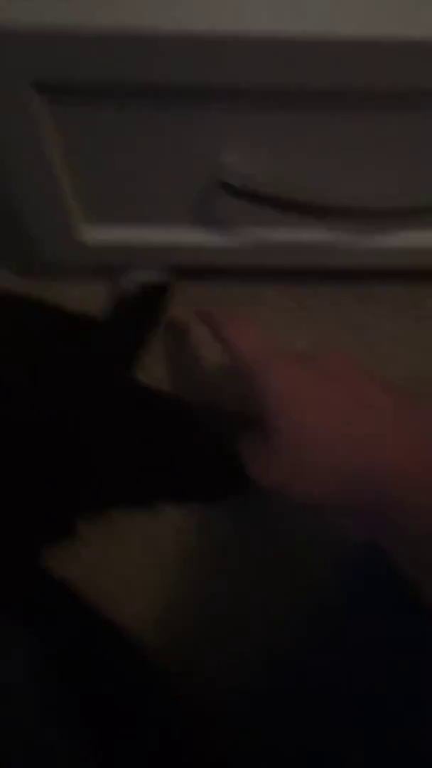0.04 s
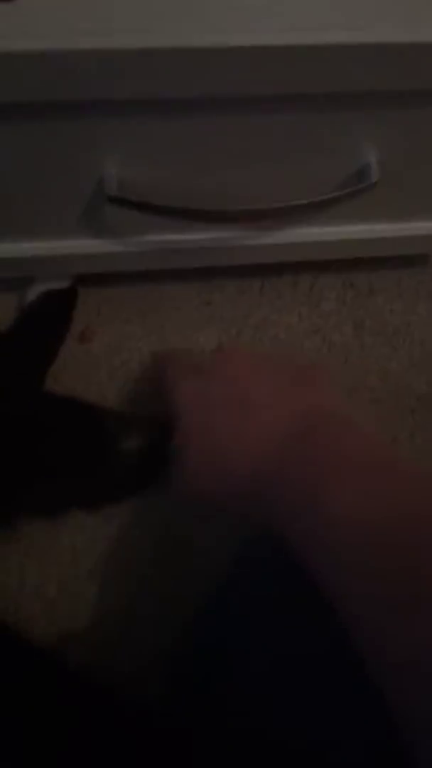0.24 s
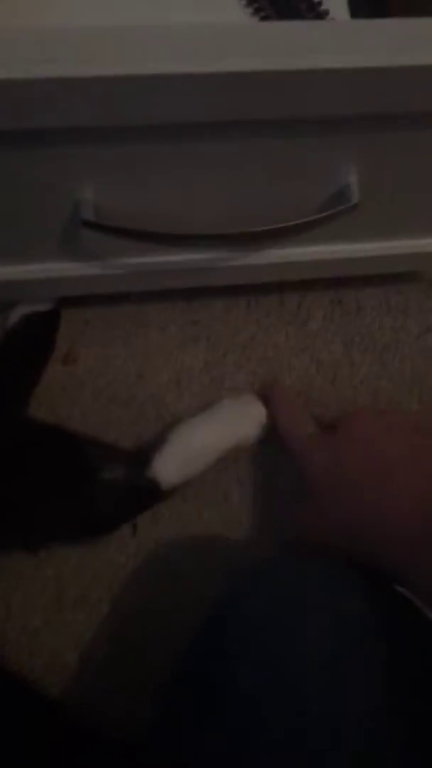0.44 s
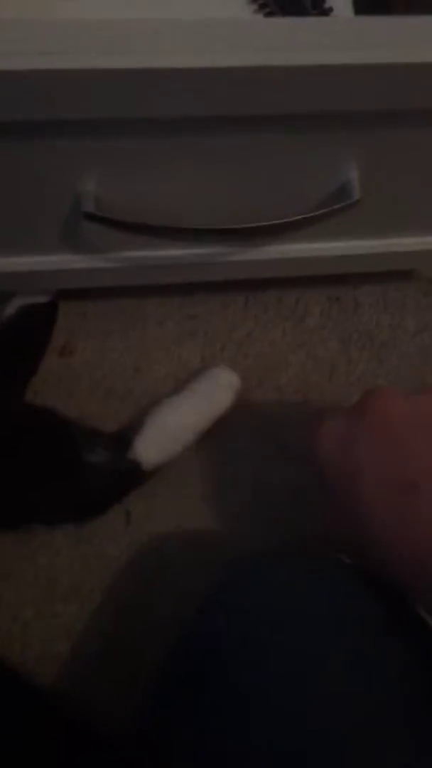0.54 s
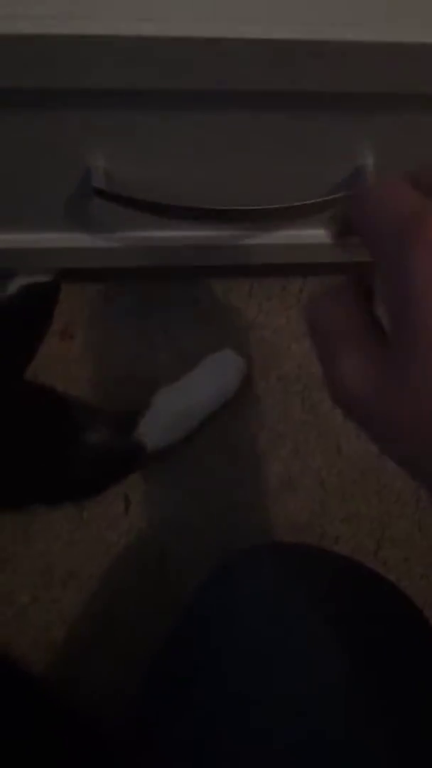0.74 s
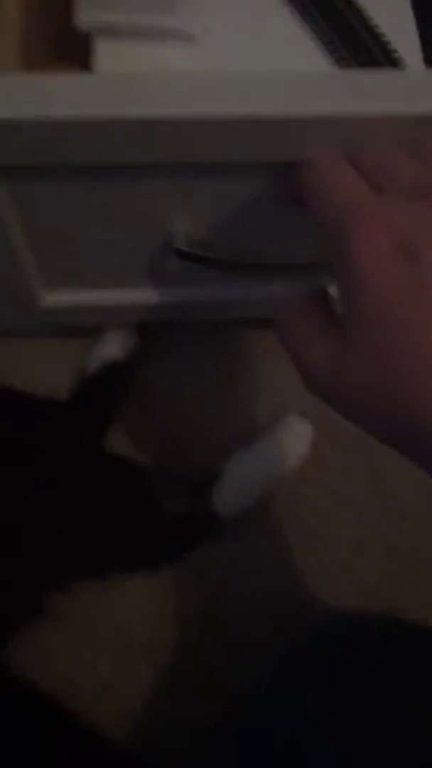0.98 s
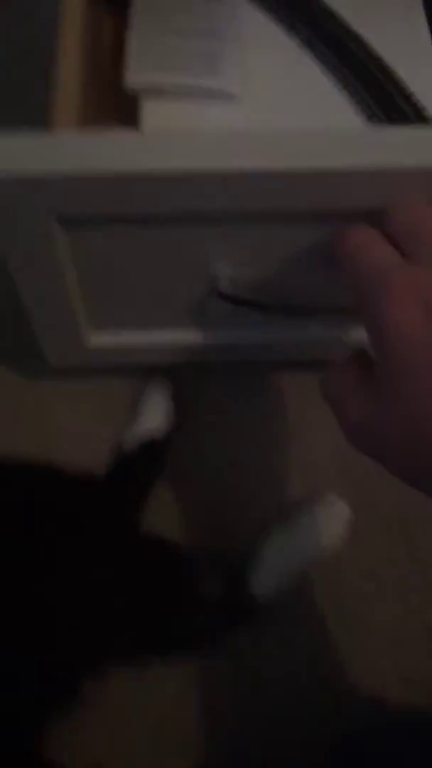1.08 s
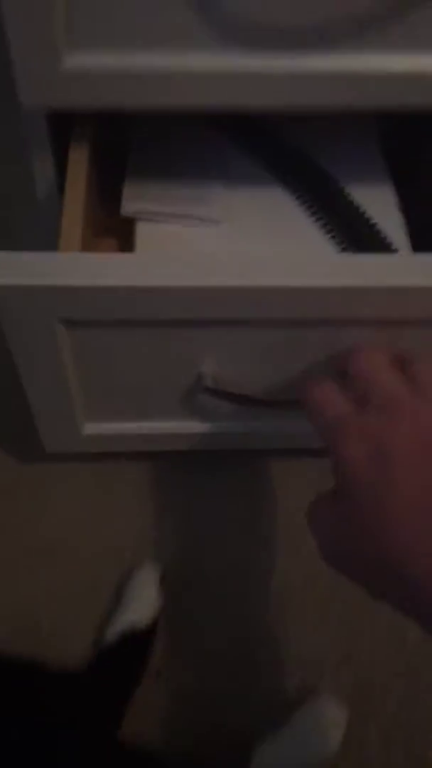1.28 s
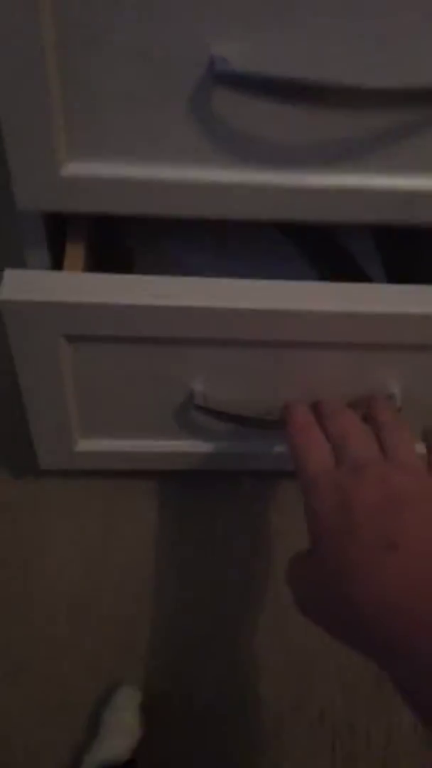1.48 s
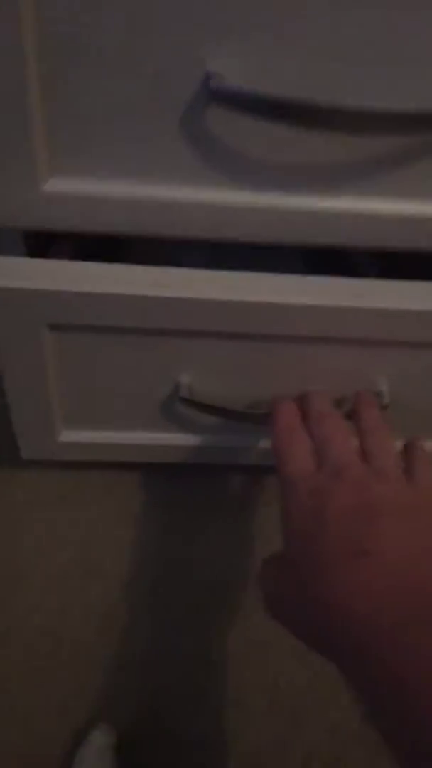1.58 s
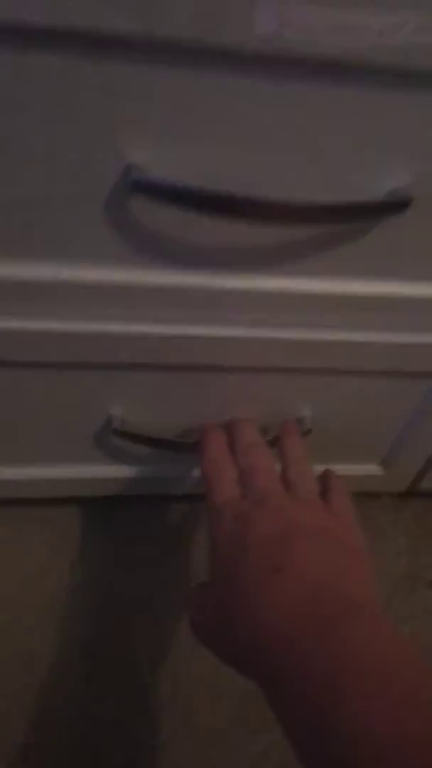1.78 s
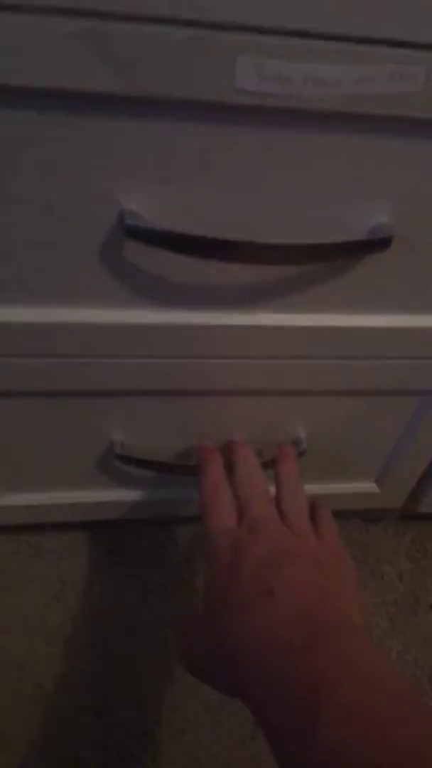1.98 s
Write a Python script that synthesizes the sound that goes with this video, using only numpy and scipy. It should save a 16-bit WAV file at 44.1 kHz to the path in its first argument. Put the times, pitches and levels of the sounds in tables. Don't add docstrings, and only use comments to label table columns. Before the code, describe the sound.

A wooden drawer closes by hand: after a quiet second of faint paw pads and rustling, it bumps and thrums along its rail, contents rattling, then clicks shut. Close, damped home room, phone microphone.

```python
import sys
import numpy as np
from scipy import signal
from scipy.fft import rfft, irfft
from scipy.io import wavfile
from scipy.ndimage import uniform_filter1d

SR = 44100
rng = np.random.default_rng(int(sys.argv[2]) if len(sys.argv) > 2 else 0)


def master_out(mix):
    frames = np.transpose(np.atleast_2d(mix))
    ceiling = np.clip(frames, -1, 1)
    pcm = np.round(ceiling * 32767).astype(np.int16)
    wavfile.write(sys.argv[1], SR, pcm)


def ratio(d):
    e = np.asarray(d, float) / 20
    return 10 ** e


N = 89302

# (frequency [Hz], density [dB per Hz])
HUSH = [(18, -33), (30, 0), (150, -9), (448, -13), (538, -11.5), (735, -19.5), (928, -18.5), (1030, -20),
        (15000, -38)]
# (peak time [s], peak level [dB], pitch [Hz])
PAWS = [
    (0.043, -65, 80),
    (.246, -44, 141),
    (0.393, -53.5, 135),
    (0.451, -55.5, 129),
    (0.641, -57, 160),
]
# (start [s], length [s], level [dB], centre [Hz], width as share of centre [-])
RUSTLES = [
    (-.02, 0.22, -68, 1960, 0.23),
    (-.02, 0.24, -73.5, 2890, 0.095),
    (-.02, 0.28, -75.5, 1360, 0.22),
    (0.058, 0.067, -74.5, 3900, 0.55),
    (0.266, .03, -77, 2630, 0.21),
    (.4, 0.31, -76, 2593, 0.38),
    (0.403, .12, -75, 3861, 1.7),
    (0.497, 1, -77.5, 1430, .054),
    (.58, 0.12, -68.5, 500, 0.45),
    (.704, 0.65, -71, 450, .17),
]
# (centre [Hz], width [Hz], level [dB])
SLEEVE = [(4200, 3600, -71), (7600, 7700, -69), (12600, 3500, -82)]
# (frequency [Hz], density [dB per Hz])
DAMPER = [(350, -27.5), (600, -16), (1720, -6.5), (2500, -10), (6690, -13), (8410, -31), (9240, -18.5),
          (10600, -32), (15000, -34)]
# (time [s], peak level [dB], pitch [Hz], t60 [s])
TICKS = [(.156, -62.5, 2710, .083), (.166, -54.5, 5760, 0.0089), (.166, -60, 12400, .009),
         (.166, -60, 10000, .009), (0.1718, -49.5, 1707, 0.035), (0.1721, -43, 2870, 0.013),
         (0.173, -42, 2083, 0.0056), (.173, -60, 5600, .0083), (.968, -51, 2100, 0.025),
         (1.035, -52, 1380, .03), (1.342, -59, 12300, .0083), (1.494, -57, 5650, .04),
         (1.496, -56, 4300, .02), (1.496, -59, 11400, .013), (1.671, -51, 2800, .03),
         (1.472, -49, 2350, .05), (1.565, -41, 1200, .03), (1.9352, -36, 3900, .005),
         (1.9345, -57, 6900, 0.0064), (1.9345, -60, 13200, .0046), (1.9353, -15, 2440, 0.0021),
         (0.969, -45, 1380, 0.023), (0.9742, -43.5, 781, 0.059), (1.0724, -52, 1543, 0.089),
          (1.0752, -41, 790, 0.1), (1.0831, -38.5, 840, 0.018), (1.0867, -47.5, 690, 0.088),
          (1.2544, -44.0, 2700, 0.02), (1.257, -40.5, 2290, 0.019), (1.2586, -38, 1310, 0.026),
          (1.2621, -43.2, 3390, 0.026), (1.2712, -42, 1600, 0.025), (1.275, -45, 3280, 0.035),
          (1.2761, -44.9, 1830, 0.046), (1.278, -37.5, 1420, 0.084), (1.2785, -49, 2330, 0.051),
          (1.3398, -51.5, 1510, 0.04), (1.3408, -48, 3399, 0.088), (1.3595, -40, 1456, 0.07),
          (1.4166, -40, 1740, 0.02), (1.4441, -48, 1980, 0.07), (1.5623, -53, 4200, 0.016),
          (1.5625, -41.0, 2590, 0.043), (1.5643, -40.5, 1960, 0.02), (1.5669, -41.5, 5620, 0.018),
          (1.5665, -46, 1684, 0.1), (1.5686, -38.6, 3630, 0.055), (1.5724, -40.5, 2290, 0.086),
          (1.574, -41, 3030, 0.049), (1.574, -43, 4200, 0.018), (1.5837, -36, 2100, 0.02),
          (1.5866, -38, 3790, 0.018), (1.6042, -45, 2100, 0.04)]
# (time [s], level [dB], t60 [s], centre [Hz], width as share of centre [-])
RATTLES = [(0.967, -58, 0.028, 1700, 1.2), (0.969, -60.5, 0.03, 12100, .8), (0.967, -50.5, 0.2, 496, 0.47),
           (1.072, -42.5, 0.11, 750, 0.4), (1.073, -51.5, 0.27, 1560, 0.92), (1.23, -49, 0.053, 2500, 0.1),
           (1.255, -45.5, 0.096, 2190, 0.34), (1.255, -53, 0.13, 3370, 0.092),
           (1.255, -57, 0.16, 5100, 0.5), (1.269, -52, 0.12, 1430, 0.078), (1.339, -53.5, 0.17, 3070, 1.15),
           (1.442, -52.5, 0.22, 3260, 0.22), (1.447, -51, 0.21, 2300, .3), (1.448, -58.5, 0.13, 5600, .3),
           (1.409, -52, 0.23, 2230, 0.41), (1.668, -65, 0.082, 12300, 0.31), (1.56, -38, 0.27, 2300, 0.41),
           (1.56, -40.5, 0.21, 3480, 0.37), (1.562, -43.5, 0.14, 6300, 0.31),
           (1.558, -45.5, 0.035, 8800, .35), (1.565, -40.5, 0.18, 1240, 0.65),
           (1.604, -52.5, 0.48, 2560, 0.71), (1.655, -48.5, 0.27, 450, 0.021),
           (1.667, -52, 0.14, 3200, 0.37), (1.934, -33.5, 0.021, 2230, 0.8), (1.945, -51, 0.13, 2030, 1.5)]
# (centre [Hz], width [Hz], level [dB])
RAIL_MODES = [(450, 69, 8.5), (603, 70, 9.5), (776, 61, 1), (1050, 63, 7), (1430, 150, 6.5),
              (1704, 190, -2.5), (2300, 170, -5.5), (2660, 100, -19), (3370, 46, -8), (3970, 79, -6.5),
              (5430, 240, -13.5), (6460, 900, -15.5), (9270, 400, -22.5)]
# (frequency [Hz], density [dB per Hz])
RAIL_WASH = [(180, -3), (400, -5.5), (600, -9.5), (3000, -17.5), (4500, -25.5), (6000, -35.5), (9000, -64),
             (15000, -63)]
# (centre [Hz], width [Hz], level [dB])
BOX_MODES = [(42, 21, -22), (91, 35, -5.5), (121, 32, -4), (153, 36, -6), (200, 17.6, -13.5),
             (254.3, 22, -20.5)]
# (peak time [s], length [s], peak level [dB], pitch [Hz])
BUMPS = [(1.003, .088, -41.5, 211.7), (1.012, 0.074, -49.5, 129), (0.989, 0.019, -43.5, 278),
         (1.072, 0.016, -45, 218), (1.099, .03, -34.5, 164.5), (1.122, 0.04, -39.5, 124),
         (1.152, 0.044, -31, 157.3), (1.165, 0.036, -35, 215.3), (1.184, 0.016, -32, 145),
         (1.186, 0.033, -33, 204), (1.224, 0.048, -28.5, 150.3), (1.23, 0.037, -38, 224),
         (1.255, 0.035, -28, 149.6), (1.262, 0.026, -37, 238), (1.288, 0.037, -25, 163.2),
         (1.317, 0.04, -35.5, 257), (1.325, 0.017, -25.5, 165.6), (1.348, 0.046, -30.5, 225),
         (1.349, 0.054, -19.5, 150.7), (1.377, .03, -22, 144), (1.402, 0.017, -28.5, 180),
         (1.424, 0.02, -20.5, 145), (1.443, 0.026, -24.5, 180), (1.472, 0.049, -28, 151.4),
         (1.493, 0.023, -33, 188), (1.518, 0.02, -27.5, 149), (1.541, 0.033, -32.5, 109),
         (1.573, 0.024, -24.5, 200), (1.573, 0.026, -37, 296), (1.587, 0.022, -24, 130),
         (1.614, 0.029, -33.5, 200), (1.619, 0.024, -27.5, 131.5), (1.641, 0.042, -27, 115.4),
         (1.671, 0.053, -43.5, 224), (1.674, 0.023, -29, 120), (1.703, 0.023, -35.6, 118),
         (1.726, 0.032, -37, 200), (1.735, 0.022, -35.5, 118), (1.751, 0.044, -35.5, 151),
         (1.77, 0.021, -34, 172), (1.78, 0.023, -32, 112), (1.8, 0.012, -36, 155),
         (1.817, 0.021, -33.5, 132), (1.862, 0.045, -38, 134.4), (1.901, 0.023, -36.5, 117),
         (1.93, 0.02, -34.5, 132), (1.957, 0.02, -47.5, 137), (1.984, 0.037, -46, 108),
         (2.012, 0.032, -34, 100.5)]
# (time [s], box thrum [dB], rail hiss [dB])
SLIDE = [
    (1.061, -44.5, -56),
    (1.15, -30.5, -56),
    (1.25, -26.5, -51.5),
    (1.34, -32, -50),
    (1.44, -23, -49.5),
    (1.511, -51.5, -52),
    (1.543, -29.5, -56),
    (1.64, -31, -54),
    (1.95, -44.5, -65),
]
# (frequency [Hz], gain [dB])
MIC = [(6000, 0), (9500, -3), (10500, -8), (11300, -2.5), (15000, -2.5)]

HUSH_DB = -67.5
PAW_S = 0.0048
RUSTLE_RISE_S, RUSTLE_FADE_SHARE, RUSTLE_FLICKER_DB = .006, .55, 1.2
SLEEVE_START_S, SLEEVE_LENGTH_S = .975, .4
DAMPER_START_S, DAMPER_RISE_S, DAMPER_DB = 1.65, .05, -58.5
RATTLE_RISE_S, RATTLE_RING_DB = 0.00032, -8
GRIT_PER_S, GRIT_SPREAD_DB = 1200, 4.5
WASH_FLICKER_DB, RING_FLICKER_DB, RAIL_RING_DB = 1.6, 4, -2
CLOSING_TILT_DB = -8.5
THRUM_DB, BUMP_WOBBLE = -12, .015
SLIDE_START_S, SLIDE_RISE_S = .967, .003
ECHO_DB, ECHO_T60_S = -21, 0.4
LOW_CUT_HZ, TOP_HZ = 33, 15800


def unit(x):
    return x / np.sqrt(np.mean(x ** 2))


def noise():
    return rng.standard_normal(N)


def ring(x, hz, width_hz, times=1):
    b, a = signal.iirpeak(hz, hz / width_hz, fs=SR)
    for _ in range(times):
        x = signal.lfilter(b, a, x)
    return x


def coloured(x, table):
    hz, db = np.array(table, float).T
    f = np.arange(N // 2 + 1) * SR / N + 1
    return irfft(rfft(x) * ratio(np.interp(np.log(f), np.log(hz), db)), N)


def walk(rate_hz):
    k = int(SR / rate_hz)
    held = np.repeat(rng.standard_normal(N // 50), k)[:N]
    return 1.3 * uniform_filter1d(uniform_filter1d(held, k), k)


def strike(t, start_s, rise_s, t60_s):
    u = np.clip(t - start_s, 0, None)
    return (1 - np.exp(-u / rise_s)) * ratio(-60 * u / t60_s)


def bell(t, peak_s, spread_s):
    return np.exp(-.5 * ((t - peak_s) / spread_s) ** 2)


def swell(t, start_s, length_s):
    rise = np.clip((t - start_s) / RUSTLE_RISE_S, 0, 1)
    fade = np.clip((start_s + length_s - t) / (RUSTLE_FADE_SHARE * length_s), 0, 1)
    return rise * fade


def grit():
    hit = rng.random(N) < GRIT_PER_S / SR
    size = np.minimum(rng.exponential(size=N), 3)
    return unit(noise() * (1 + hit * ratio(GRIT_SPREAD_DB * size)))


def brushing():
    return ratio(RUSTLE_FLICKER_DB * walk(40.04)) * grit()


def metal(x, flicker_db):
    out = 0
    for hz, width_hz, db in RAIL_MODES:
        mode = ring(ring(x, hz, 2.56 * width_hz), hz, 3 * width_hz)
        out = out + ratio(db + np.roll(flicker_db, int(hz))) * mode
    return unit(out)


def room_hush():
    return ratio(HUSH_DB + 0.17 * walk(4.2)) * unit(coloured(noise(), HUSH))


def cat(t):
    out = 0
    for peak_s, db, hz in PAWS:
        out = out + ratio(db) * bell(t, peak_s, PAW_S) * np.cos(2 * np.pi * hz * (t - peak_s))
    fur = brushing()
    for start_s, length_s, db, hz, share in RUSTLES:
        band = unit(ring(fur, hz, min(share * hz, 12000.)))
        out = out + ratio(db) * swell(t, start_s, length_s) * band
    return out


def sleeve(t):
    cloth = brushing()
    bands = sum(ratio(db) * unit(ring(cloth, hz, width_hz, 2)) for hz, width_hz, db in SLEEVE)
    return swell(t, SLEEVE_START_S, SLEEVE_LENGTH_S) * bands


def damper(t):
    level = ratio(DAMPER_DB + 0.84 * walk(13.7))
    onset = np.clip((t - DAMPER_START_S) / DAMPER_RISE_S, 0, 1)
    return level * onset * unit(coloured(noise(), DAMPER))


def ticks(t):
    out = 0
    for start_s, db, hz, t60_s in TICKS:
        out = out + ratio(db) * strike(t, start_s, .0001, t60_s) * np.sin(2 * np.pi * hz * (t - start_s))
    return out


def rattles(t):
    raw = grit()
    raw = raw + ratio(RATTLE_RING_DB) * metal(raw, np.zeros(1))
    out = 0
    for start_s, db, t60_s, hz, share in RATTLES:
        band = unit(ring(raw, hz, min(hz * share * 2, 15000.), 3))
        out = out + ratio(db) * strike(t, start_s, RATTLE_RISE_S, t60_s) * band
    return out


def rail(db):
    wash = ratio(WASH_FLICKER_DB * walk(45.37)) * unit(coloured(grit(), RAIL_WASH))
    rings = metal(grit(), RING_FLICKER_DB * walk(34.4))
    return ratio(db) * (wash + ratio(RAIL_RING_DB) * rings)


def box_thrum(t, db):
    out = 0
    for hz, width_hz, mode_db in BOX_MODES:
        tilt_db = CLOSING_TILT_DB * (t - 3.5) * np.log2(hz / 150)
        out = out + ratio(mode_db + tilt_db) * unit(ring(noise(), hz, 2.4 * width_hz, 2))
    return ratio(db + THRUM_DB) * unit(out)


def roller_bumps(t):
    drift_s = np.cumsum(BUMP_WOBBLE * walk(30)) / SR
    out = 0
    for peak_s, length_s, db, hz in BUMPS:
        late_s = t - peak_s + drift_s - np.interp(peak_s, t, drift_s)
        tone = np.sin(2 * np.pi * (hz * late_s + rng.random()))
        out = out + ratio(db) * bell(t, peak_s, 0.34 * length_s) * tone
    return out


def echo(x):
    n = N // 6
    tail = rng.standard_normal(n) * strike(np.arange(n) / SR, .004, .004, ECHO_T60_S)
    return ratio(ECHO_DB) * signal.fftconvolve(x, tail / np.sqrt(np.sum(tail ** 2)))[:N]


def scene():
    t = np.arange(N) / SR
    slide_s, thrum_db, hiss_db = np.array(SLIDE, float).T
    moving = np.clip((t - SLIDE_START_S) / SLIDE_RISE_S, 0, 1)
    background = room_hush() + cat(t) + sleeve(t)
    bright = damper(t) + ticks(t) + rattles(t) + moving * rail(np.interp(t, slide_s, hiss_db))
    box = moving * (box_thrum(t, np.interp(t, slide_s, thrum_db)) + roller_bumps(t))
    return (background + bright + echo(bright) + box)[None]


def band_limit(x):
    return signal.sosfilt(signal.butter(12, 15900, fs=SR, output="sos"), x)


def record(dry):
    low_cut = signal.butter(1, LOW_CUT_HZ, "high", fs=SR, output="sos")
    top_cut = signal.ellip(10, .2, 70, TOP_HZ, fs=SR, output="sos")
    x = signal.sosfilt(low_cut, coloured(dry, MIC))
    x = signal.sosfilt(top_cut, x)
    return band_limit(x)


dry = scene()
out = record(dry)
master_out(out)
```